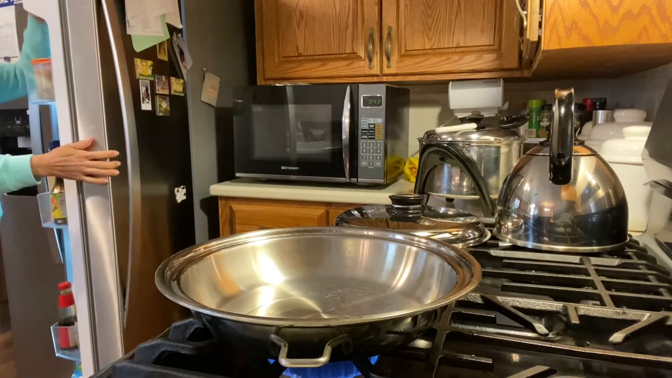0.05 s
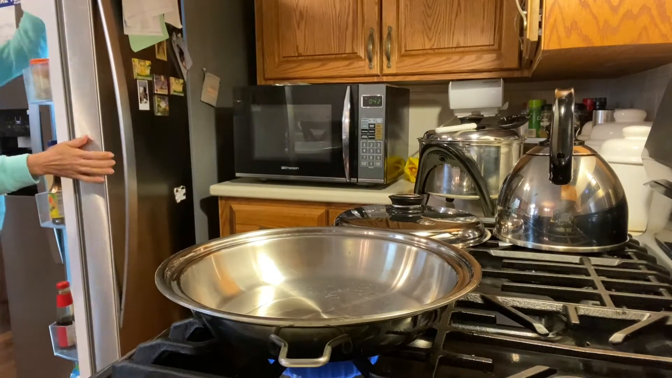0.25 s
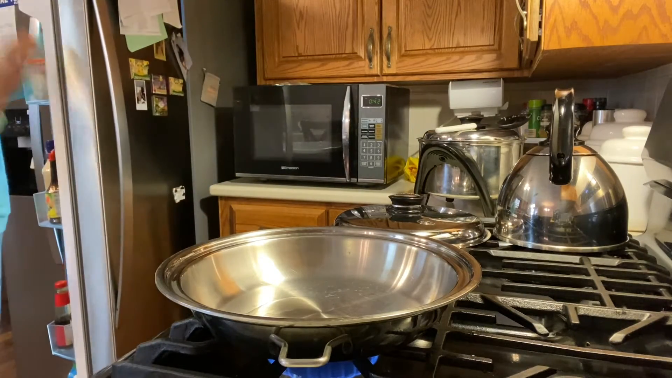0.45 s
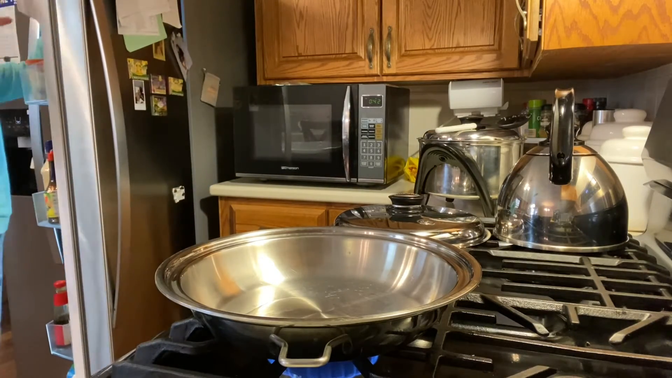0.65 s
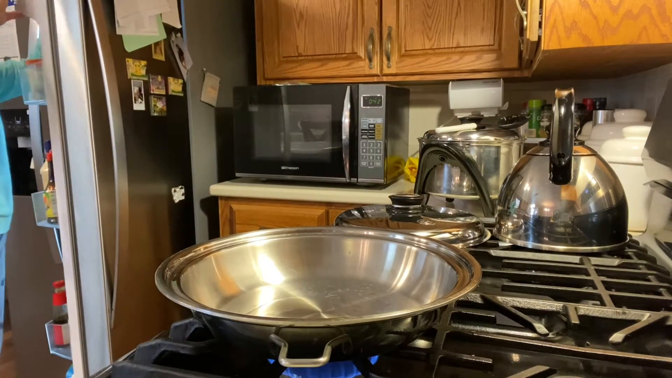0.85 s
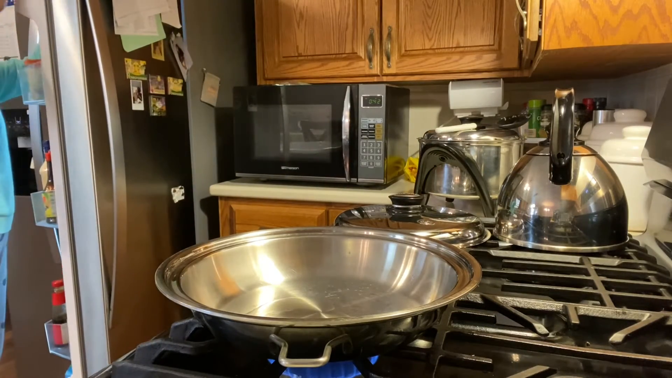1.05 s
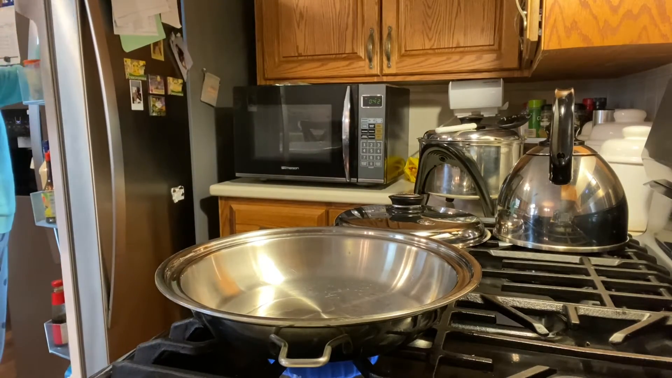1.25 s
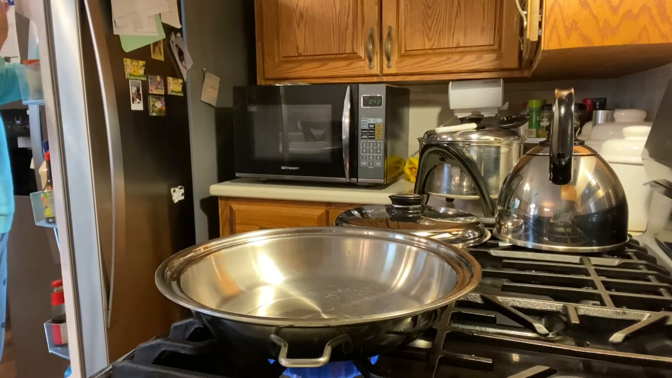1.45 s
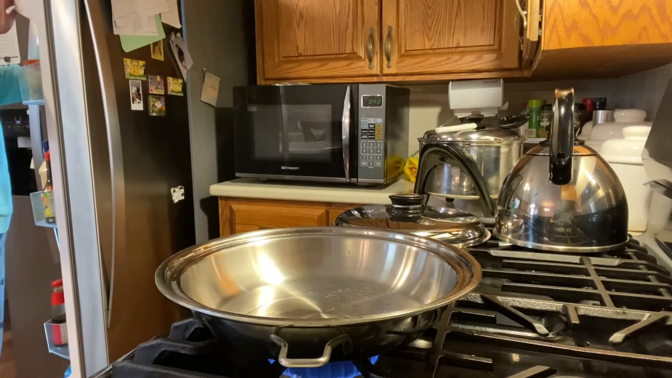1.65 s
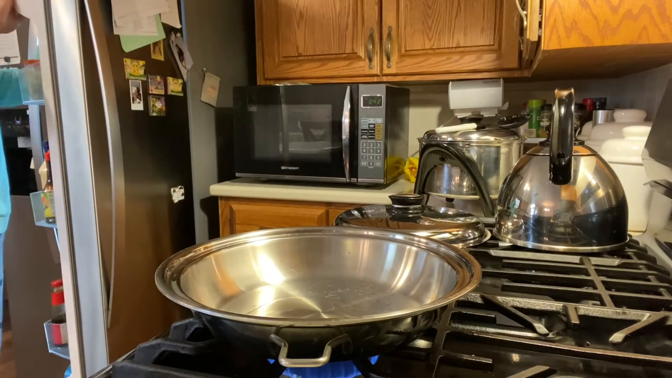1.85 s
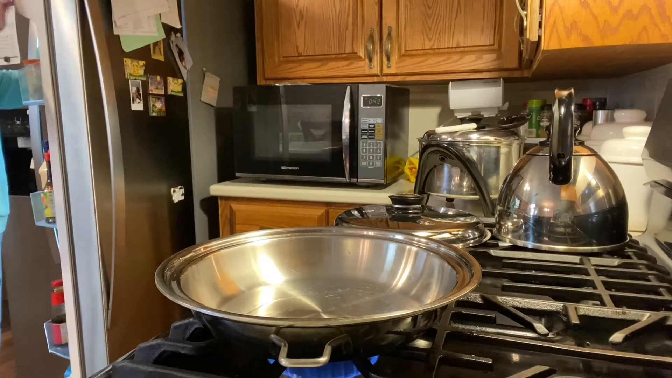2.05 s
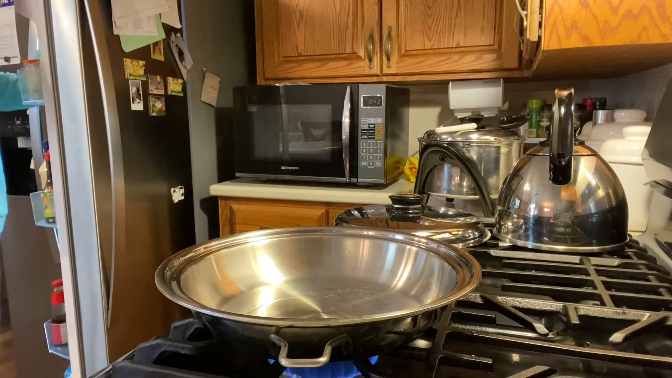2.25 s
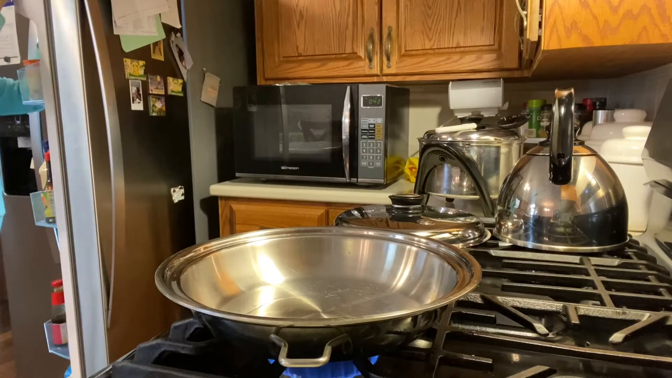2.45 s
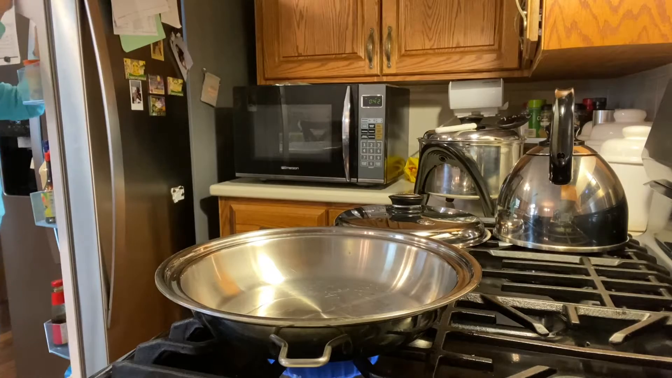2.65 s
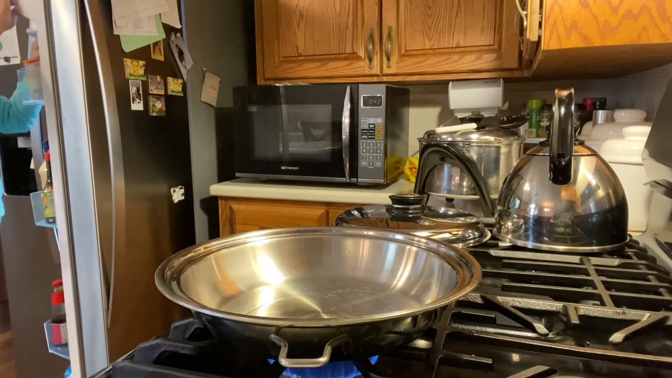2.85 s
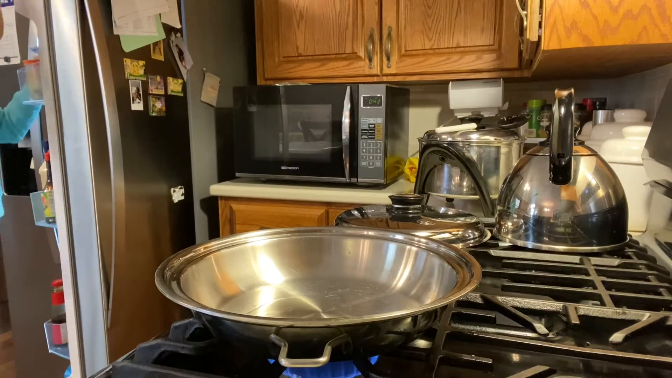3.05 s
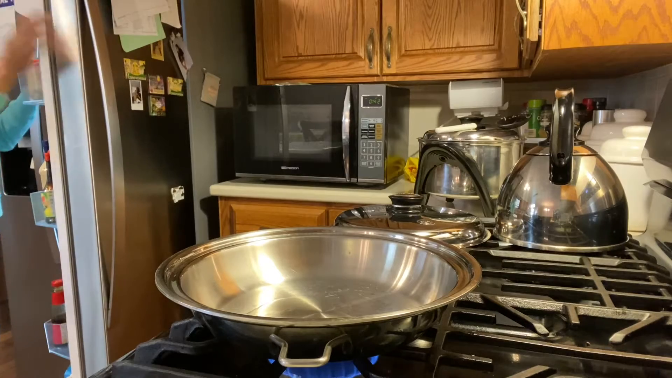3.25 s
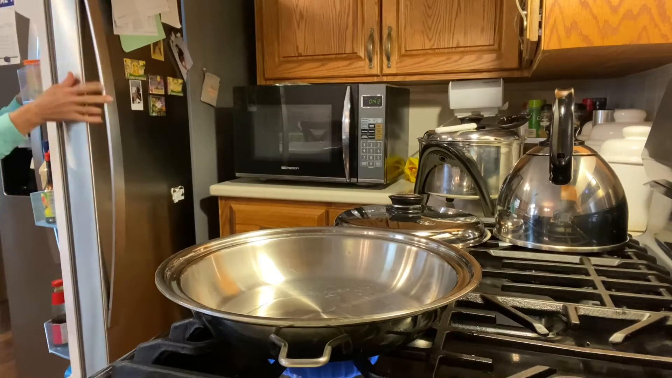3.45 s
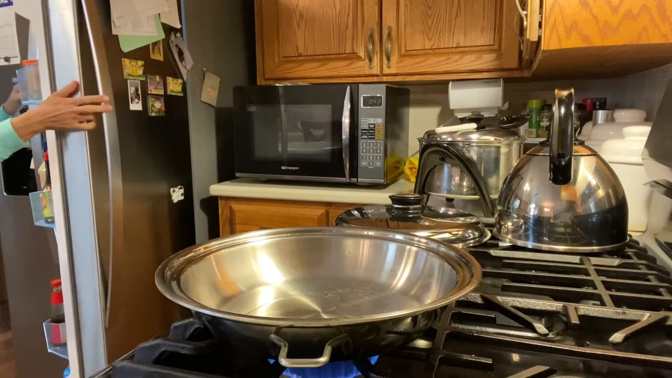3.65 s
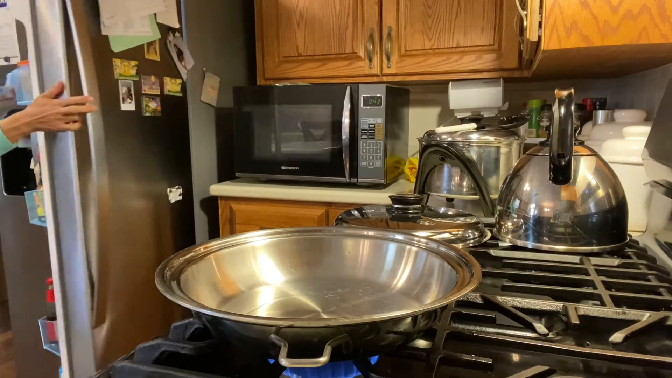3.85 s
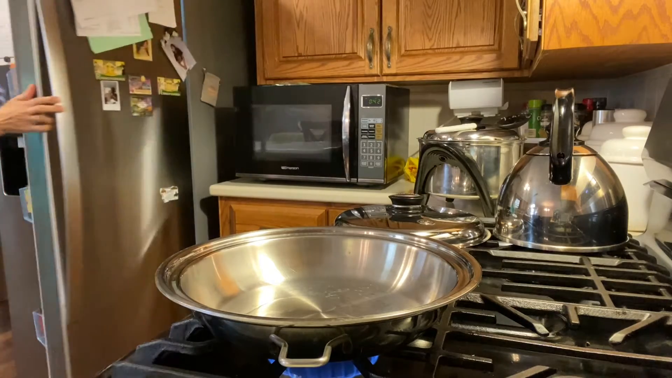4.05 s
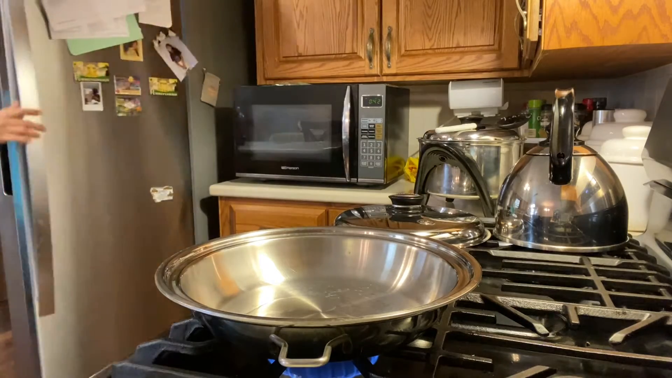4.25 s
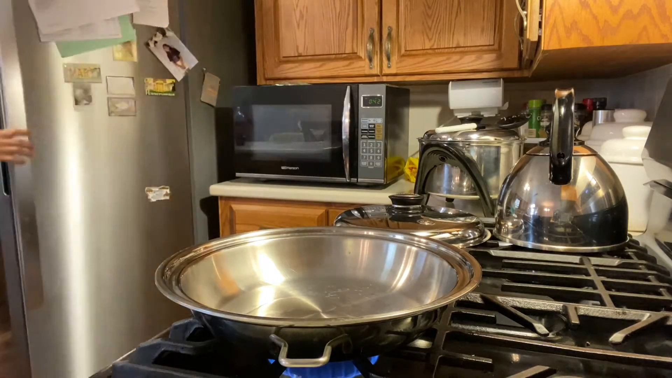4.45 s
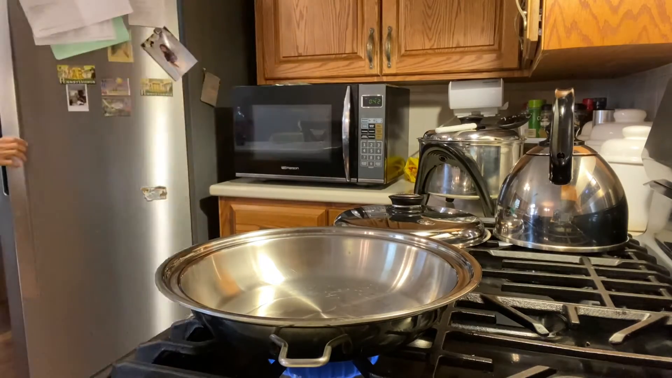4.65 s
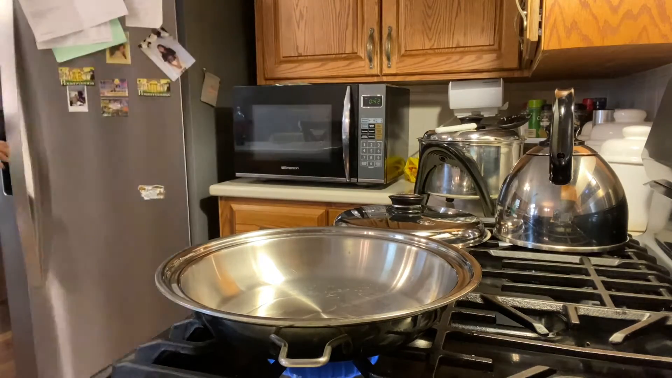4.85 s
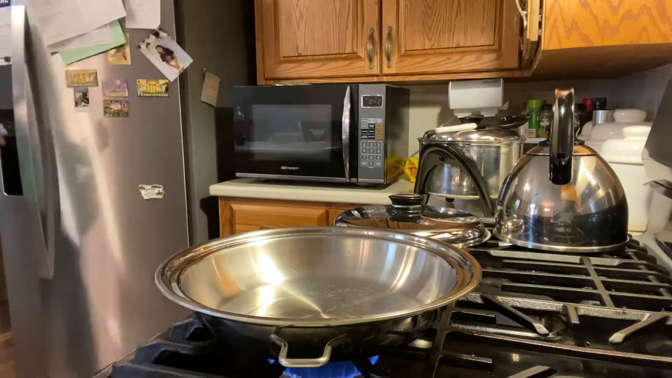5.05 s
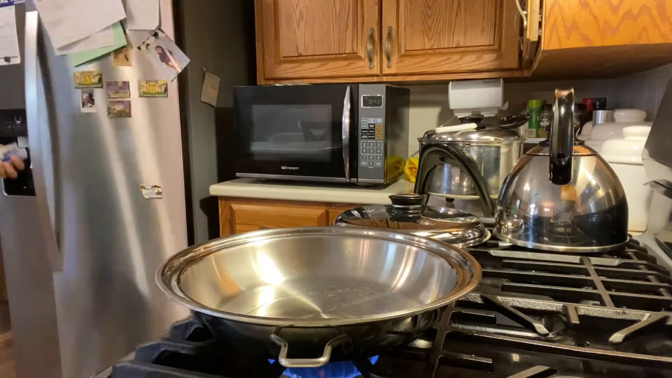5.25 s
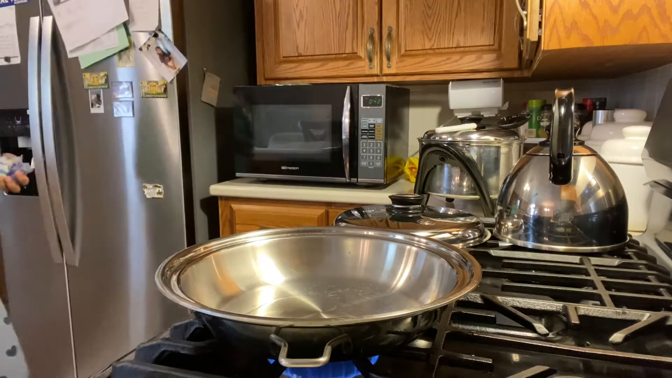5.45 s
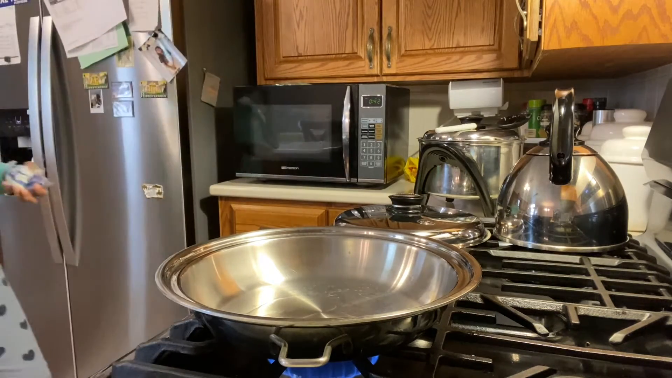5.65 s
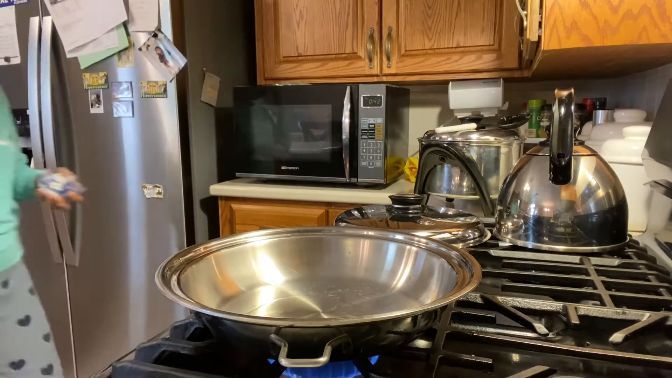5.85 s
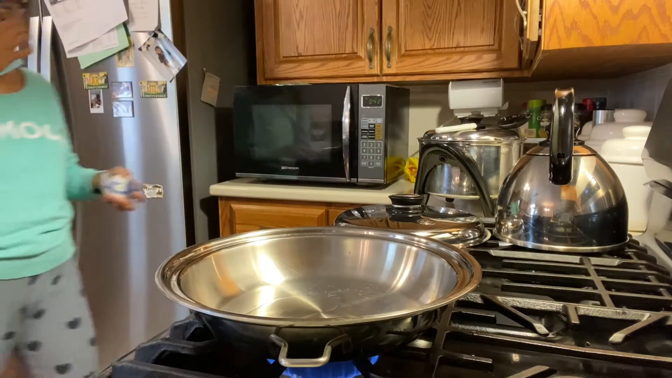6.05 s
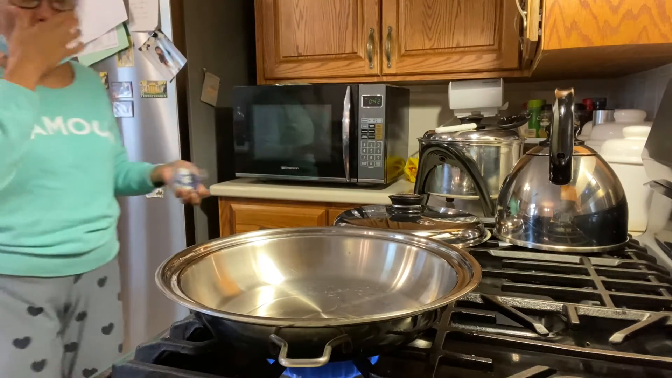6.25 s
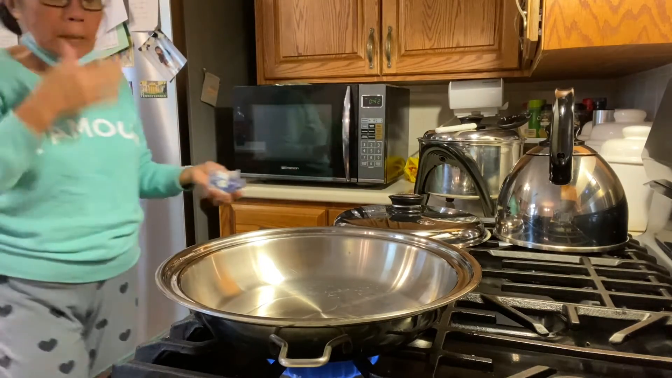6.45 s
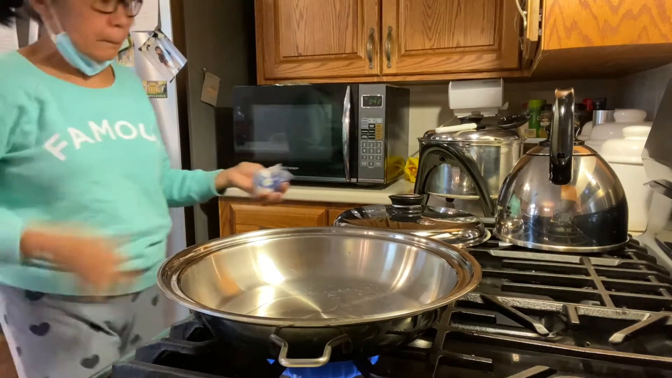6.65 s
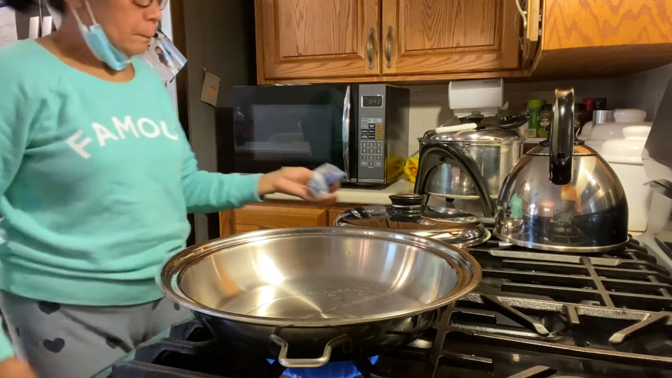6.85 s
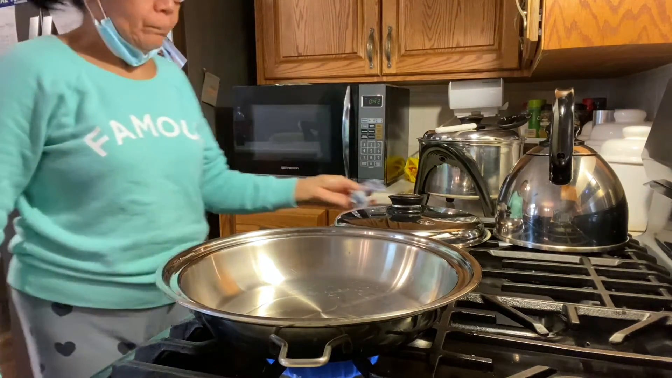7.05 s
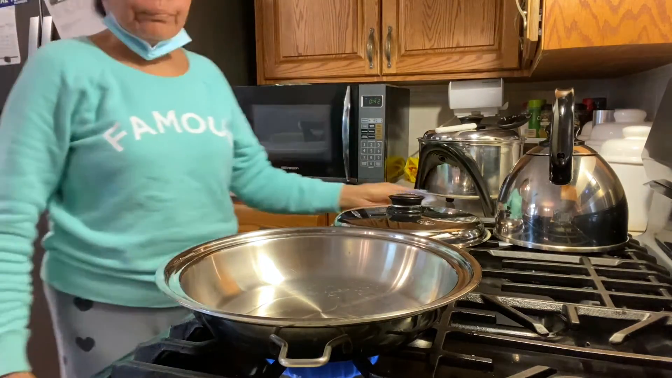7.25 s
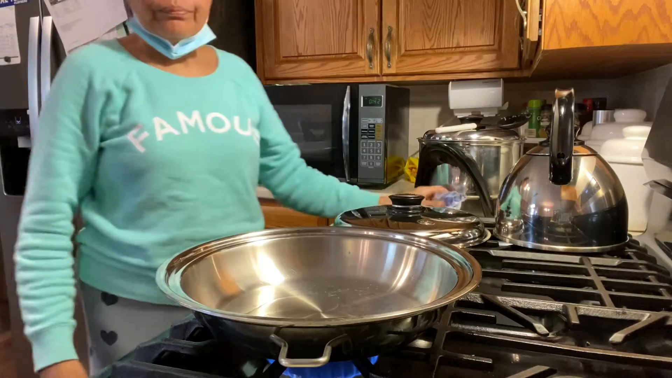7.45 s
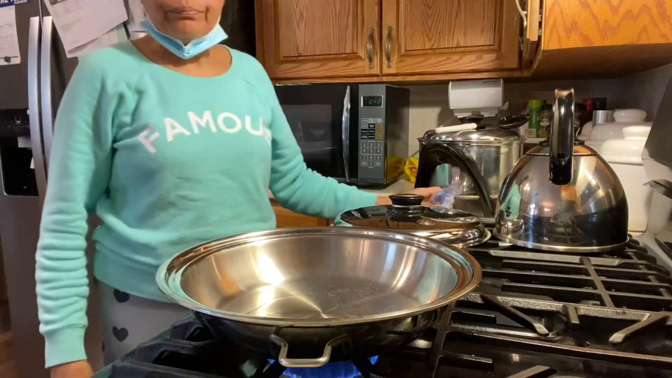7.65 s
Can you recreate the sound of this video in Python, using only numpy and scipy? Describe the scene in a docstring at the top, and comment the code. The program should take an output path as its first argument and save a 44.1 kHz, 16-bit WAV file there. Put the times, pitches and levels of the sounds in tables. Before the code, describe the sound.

In a home kitchen, a refrigerator hums while containers knock, wrappers rustle and plastic clicks. A plastic drawer bangs home with a quick clatter, something settles on a shelf, and the hum drops just before the door shuts with a deep thud. Soft footsteps and clothing follow, then close packet taps. Parrots chirp and squawk in the distance. Stereo microphone nearby, handling slightly left.

```python
"""A drawer is shoved home with a clatter and a refrigerator door swings shut with a thud, after some rummaging.
The hum drops just before the door lands and runs down; footsteps and a few taps at the counter follow.
Parrots chirp and rasp further off in the house. The close sounds reach the left microphone first.
Blows ring sine modes and noise bursts, rubbing is random grains, parrots are gliding rasped sines,
the hum is wavering sines over coloured noise; a decaying noise tail is the hard kitchen's echo."""
import sys
import numpy as np
from scipy import signal
from scipy.fft import rfft, irfft, next_fast_len
from scipy.io import wavfile

SR = 44100
rng = np.random.default_rng(int(sys.argv[2]) if len(sys.argv) > 2 else 0)


def generate_wav(sig):
    """Save sig (samples, or channels by samples) to the path in sys.argv[1] as 16-bit PCM at SR."""
    pcm = np.round(np.clip(np.atleast_2d(sig).T, -1, 1) * 32767).astype(np.int16)
    wavfile.write(sys.argv[1], SR, pcm)


N = 340517
TIME = np.arange(N) / SR  # s

# Levels in the tables are relative: the layers scale them further for distance and balance. # Ringing of door
# and cabinet, drawer, bumped cabinet: (frequency [Hz], level [dB], 60 dB decay [s])
DOOR_MODES = [(66.2, -3, 0.134), (111, -13, 0.24), (192, -22, 0.38), (239, -34, 0.83), (405, -37, 0.13),
              (505, -19.5, 0.26), (553, -19, 0.19), (680, -41, 0.33), (893, -31, 0.54), (1370, -37, 0.35)]
DRAWER_MODES = [(96, 3, 0.72), (124.5, -1, 0.63), (207, 4, 0.41), (231, 4, 0.45), (304, -5, 0.44),
                (343.5, 0, 0.63), (458, -4, 0.53), (537, 0, 0.24), (548, 14, 0.045), (723, -7, 0.2),
                (900, -9.5, 0.36), (876, 17, 0.027), (1197, 0, 0.18), (1260, 17, 0.034)]
CABINET_MODES = [(92, -1, 0.53), (122.5, -2.5, 0.41), (201.3, 3.5, 0.29), (238, -1.5, 0.4), (400.6, -9, 0.15),
                 (690, -13, 0.38)]
# Slap of the door seal, clatter of drawer and bumped cabinet: (frequency [Hz], density [dB per Hz])
DOOR_SLAP = [(60, 0), (400, -0.5), (650, 4), (820, -1), (1150, -5), (2200, -11), (3200, -23.5), (4400, -20),
             (7800, -18), (14000, -30)]
DRAWER_CLATTER = [(60, -12.5), (250, 7.5), (450, 1.5), (800, -5.5), (1300, -9), (2200, -13.5), (8500, -24),
                  (14000, -20.5)]
# Blows on door, drawer, cabinet: (time [s], ring level [dB], clatter level [dB])
DOOR_BLOWS = [(5.468, -4, -23.5), (5.497, -24, -41.5)]
DRAWER_BLOWS = [(2.955, -26.5, -28.5), (2.972, -37.5, -36.5), (2.988, -52, -34.5)]
CABINET_BLOWS = [(1.228, -33, -56.5), (3.359, -35, -55.5), (3.386, -31.5, -57.5)]

# Containers knocking on the shelves: (time [s], level [dB], body tone [Hz], clack level [dB])
KNOCKS = [(1.066, -41, 670, -61), (1.078, -34.5, 444, -53), (1.219, -38, 600, -53),
          (1.229, -29.5, 423, -48), (1.491, -27.5, 625, -38.5), (1.54, -41.5, 454, -67),
          (1.766, -38, 646, -49.5), (2.06, -38, 548, -54.5), (3.357, -32.5, 644, -52.5)]
# Thump against ring: 0 dB at this body tone, weaker for higher ones
THUMP_HZ, THUMP_DB_PER_OCTAVE = 317, -20
# Light plastic clicks: (time [s], level [dB], band centre [Hz])
CLICKS = [(0.778, -45, 8240), (1.4579, -39, 7100), (1.5601, -38.5, 5430), (2.3278, -44, 3100),
          (2.596, -50, 5640), (2.71, -48, 3120), (3.353, -44, 7400), (4.973, -49, 3000),
          (5.2605, -41, 1180), (5.861, -48.5, 8000)]
# The plastic crinkles from just before each click until after it; level relative to the click
CRINKLE_LEAD_S, CRINKLE_S, CRINKLE_DB = 0.091, 0.33, -25.5

# Sliding packages and drawer, swinging door: (time [s], length [s], rustle level [dB], scrape level [dB])
SLIDES = [(0.736, 0.25, -67.5, -65), (0.965, 0.36, -84, -55.5), (1.383, 0.19, -72, -56),
          (1.734, 0.21, -60, -54.5), (2.067, 0.28, -70.5, -85), (2.861, 0.2, -55.5, -63),
          (5.102, 0.2, -77, -67.5)]
# The seal brushes the cabinet just before the door lands
SEAL_LEAD_S, SEAL_BRUSH_S, SEAL_RUSTLE_DB, SEAL_SCRAPE_DB = 0.055, 0.079, -55, -52.5
# Colour of wrappers and of boxes rubbing: (frequency [Hz], density [dB per Hz])
RUSTLE = [(500, 5), (2000, 10.5), (5000, 4), (8000, 3), (14000, 3)]
SCRAPE = [(200, -27.5), (420, 0.5), (700, -16), (1500, -14), (3000, -27.5)]
# Clothes and slippers on the way to the counter: (time [s], level [dB])
SHUFFLE = [(5.3, -121), (6, -66.5), (6.7, -64), (7.72, -64)]

# Taps of a light packet close by: (time [s], level [dB])
TAPS = [(6.246, -32.5), (7.489, -28.5), (7.513, -22.5), (7.523, -23), (7.602, -20.5)]
# Footsteps, all on the same floor: (time [s], level [dB], thump against ring [dB])
STEPS = [(5.817, -30, 0), (6.563, -44, 2.5), (7.16, -42.5, 4.5)]
FLOOR_HZ, SOLE_SLAP_DB = 354, -14  # slap relative to the step

# Whistles climbing to a crest, then swooping to a sinking note: (crest time [s], length after it [s],
# crest pitch [Hz], held pitch [Hz], fall time [s], level [dB], rasp [0-1], octave level [dB])
SWOOPS = [(0.04, 0.07, 2900, 2406, 0.02, -55, 0.3, -1), (0.53, 0.28, 2950, 1329, 0.039, -68.5, 0.32, -7),
          (4.615, 0.16, 3100, 1710, 0.048, -65.5, 0.48, -5),
          (7.46, 0.071, 3700, 3050, 0.047, -56.5, 0.36, 8.5)]
# The climb starts this much lower, softer and harsher
CLIMB_S, CLIMB_OCTAVES, CLIMB_DB, CLIMB_RASP = 0.074, 0.46, -9, 0.43
# Softer at the crest; the last note fades and sinks
SWOOP_CREST_DB, SWOOP_FADE_DB, SWOOP_SAG_OCTAVES = -2, -2.5, -0.3
# Short chirps: (time [s], length [s], pitch [Hz], rise [octaves], level [dB], rasp [0-1], octave level [dB])
CHIRPS = [(0.069, 0.048, 4300, -0.29, -58.5, 0.75, -1.5), (0.107, 0.069, 3467, -0.04, -55.5, 0.27, -13.5),
          (0.543, 0.0299, 1996, -0.3, -58.5, 0.46, -19), (4.792, 0.0397, 1898, 0.41, -60, 0.21, -12.5),
          (5.545, 0.13, 2107, 0.088, -58, 0.2, -18), (5.674, 0.022, 3090, 0.115, -60.5, 0.66, -17),
          (5.912, 0.021, 2380, 0.081, -50, 0.39, 6.5), (6.374, 0.065, 4064, 0.3, -56, 0.24, -9.5),
          (7.518, 0.12, 2383, 0.096, -56, 0.07, -23)]
# Harsh squawks: (time [s], length [s], pitch [Hz], level [dB])
SQUAWKS = [(5.096, 0.09, 1682, -71), (6.079, 0.076, 3063, -58), (6.172, 0.066, 3470, -49.5),
           (6.641, 0.0365, 2753, -48), (6.831, .066, 3440, -50.5), (7.034, 0.13, 2523, -50.5)]
SQUAWK_RASP, SQUAWK_CLEAR_RASP = 0.92, 0.28  # harsh start, clearer end
SQUAWK_RISE_OCTAVES, SQUAWK_OCTAVE_DB, SQUAWK_HISS_DB = 0.076, -0.5, -6
SQUAWK_RATTLE_HZ, SQUAWK_RATTLE_DB = 110, 5.5

# Refrigerator motor and fan, then faint steady kitchen tones: (frequency [Hz], rms level [dB])
HUM = [(59.2, -57.5), (177.6, -68.5), (204.2, -58.5), (355.3, -71)]
WHINE = [(120, -67.5), (2050, -73)]
# The closing door shuts the hum in: when, how fast and how far it falls; it also runs down
HUM_SHUT_S, HUM_SHUT_DB_PER_S, HUM_SHUT_DB, HUM_RUN_DOWN_DB_PER_S = 5.13, -90, -7, -12
# Air noise of the kitchen: (frequency [Hz], density [dB per Hz])
AIR = [(25, -20), (55, -4), (90, -11), (130, -2), (260, -9.5), (370, -12), (550, -20.5), (1500, -29),
       (2300, -27.5), (6000, -40), (15000, -34.5)]
AIR_DB = -58.5

# Echo of the kitchen: (frequency [Hz], 60 dB decay [s])
ROOM_T60 = [(200, 0.64), (1840, 0.42), (4850, 0.43), (15000, 0.13)]
# Left-right likeness of diffuse sound: (frequency [Hz], likeness [0-1])
SAME = [(60, 0.94), (200, 0.037), (500, 0.071), (5000, 0.024), (12000, 0.28)]
# Microphone response: (frequency [Hz], gain [dB])
MICROPHONE = [(20, -32), (40, 4), (9350, -5), (10050, -29), (10900, -33), (11800, -11), (14000, -10.5),
              (15400, -43)]
EDGE_HZ = 15750  # upper band limit


def door():
    """The seal slaps the cabinet, which booms; a weaker second blow is the door shelves jolting just after."""
    ring, slap = struck(DOOR_BLOWS, DOOR_MODES, DOOR_SLAP, clatter_t60=0.06, rise_cycles=0.55, spike=3)
    return direct(ring + slap, balance_db=-2.5) + amp(1.0) * room(slap)


def drawer():
    """A plastic drawer hits its stop: one hard blow, then two quick lighter ones that ring less each time."""
    ring, clatter = struck(DRAWER_BLOWS, DRAWER_MODES, DRAWER_CLATTER,
                           clatter_t60=0.047, rise_cycles=6.0, spike=4.4)
    return direct(ring + clatter, balance_db=-2.5) + amp(5.0) * room(clatter)


def cabinet():
    """The open door and cabinet are bumped and boom in their low modes."""
    ring, clatter = struck(CABINET_BLOWS, CABINET_MODES, DRAWER_CLATTER,
                           clatter_t60=0.04, rise_cycles=0.91, spike=2.1)
    return direct(ring + clatter, balance_db=-3.5) + amp(8.5) * room(clatter)


def struck(blows, modes, spectrum, clatter_t60, rise_cycles, spike):
    """Each blow clatters and rings the modes; low modes answer later and take longer to build up."""
    body, ring, clatter = np.zeros(SR), np.zeros(N), np.zeros(N)
    for hz, db, t60 in modes:
        t = np.maximum(np.arange(SR) / SR - 0.19 / hz, 0)  # starts 0.19 cycles late
        build_up = 1 - np.exp(-t * hz / rise_cycles)
        body -= amp(db - 60 * t / t60) * build_up * np.sin(2 * np.pi * hz * t)
    for s, ring_db, clatter_db in blows:
        add(ring, s, amp(ring_db) * body)
        hit = colour(burst(clatter_t60, spike), spectrum)
        add(clatter, s, sized(hit, clatter_db))
    return ring, clatter


def knocks():
    """Containers land with a clack and a brief rattle: the lower one rings, the more it thumps."""
    out = np.zeros(N)
    for s, db, hz, clack_db in KNOCKS:
        thump_db = THUMP_DB_PER_OCTAVE * np.log2(hz / THUMP_HZ)
        clack = band(burst(t60=0.062, spike=0.83), 890, 1100, order=1)
        loose = band(rattle(t60=0.12, ticks_per_s=330), 1670, 2260)
        add(out, s, knock(db, hz, thump_db))
        add(out, s, sized(clack, clack_db))
        add(out, s, sized(loose, clack_db - 8.5))
    return direct(out, balance_db=-5.0) + amp(-1.0) * room(out)


def knock(db, hz, thump_db):
    """A hollow body tone and a thump of what lies beneath, as band-filtered contacts."""
    contact = burst(t60=0.11, spike=5.3)
    hollow = sized(band(contact, 210, 650), -3.0)
    tone = sized(band(contact, hz / 1.06, hz * 1.046, order=1), -0.99)
    thump = sized(band(burst(t60=0.08, spike=25), 100, 290, order=3), thump_db)
    return amp(db - 11.0) * (hollow + tone + thump)


def rattle(t60, ticks_per_s):
    """Loose contents tick at random and settle."""
    t = np.arange(SR // 3) / SR
    ticks = rng.standard_normal(len(t)) * (rng.random(len(t)) < ticks_per_s / SR)
    return ticks * amp(-60 * t / t60)


def clicks():
    """Thin plastic snaps: very short bursts, each with its own broad colour."""
    out = np.zeros(N)
    for s, db, hz in CLICKS:
        snap = colour(burst(t60=0.004, spike=9), RUSTLE)
        snap = band(snap, 900, 20000, order=1)
        octave = band(snap, hz / np.sqrt(2), hz * np.sqrt(2), order=1)
        add(out, s, sized(snap, db - 13.5) + sized(octave, db - 14))
    return amp(-1.5) * direct(out, balance_db=-3.0) + amp(8.5) * room(out)


def handling():
    """Wrappers rustle, boxes scrape and the seal brushes; later, clothes and slippers brush along."""
    rustle, scrape = np.zeros((2, N))
    seal = (DOOR_BLOWS[0][0] - SEAL_LEAD_S, SEAL_BRUSH_S, SEAL_RUSTLE_DB, SEAL_SCRAPE_DB)
    for s, length, rustle_db, scrape_db in [*SLIDES, seal]:
        stroke = signal.windows.tukey(int(length * SR), 0.6)
        add(rustle, s, amp(rustle_db) * stroke)
        add(scrape, s, amp(scrape_db) * stroke)
    crinkle = signal.windows.tukey(int(CRINKLE_S * SR), 0.6)
    for s, db, _ in CLICKS:
        add(rustle, s - CRINKLE_LEAD_S, amp(db + CRINKLE_DB) * crinkle)
    walking = amp(np.interp(TIME, *np.transpose(SHUFFLE)))
    out = (rustle + amp(5.0) * walking) * friction(RUSTLE, grains_per_s=1300, spread_db=2.0)
    out += (scrape + amp(-11.0) * walking) * friction(SCRAPE, grains_per_s=750, spread_db=-0.5)
    return direct(out, balance_db=-1.5) + room(out)


def friction(spectrum, grains_per_s, spread_db):
    """Rubbing as many tiny slips of uneven size at random moments."""
    slips = rng.standard_normal(N) * (rng.random(N) < grains_per_s / SR)
    size = amp(spread_db * np.minimum(rng.exponential(1, N), 4))
    return evened(colour(slips * size, spectrum))


def steps():
    """Slippers land dully on the floor, with a soft slap of the sole."""
    out = np.zeros(N)
    for s, db, thump_db in STEPS:
        slap = band(burst(t60=0.026, spike=14.0), 903, 1710, order=3)
        add(out, s, knock(db, FLOOR_HZ, thump_db))
        add(out, s, sized(slap, db + SOLE_SLAP_DB))
    return direct(out, balance_db=4) + room(out)


def taps():
    """A light packet handled and set down close by: short, dry ticks with a hollow ring."""
    out = np.zeros(N)
    for s, db in TAPS:
        contact = burst(t60=0.04, spike=6)
        tick = sized(band(contact, 940, 2300), db - 24.5)
        hollow = sized(band(contact, 100, 3600, order=1), db - 26.5)
        add(out, s, tick + hollow)
    return direct(out, balance_db=-9.0) + amp(-9.5) * room(out)


def birds():
    """Distant parrots swoop, chirp and squawk, heard mostly by their echo."""
    out = np.zeros(N)
    for crest_s, *shape in SWOOPS:
        start = crest_s - CLIMB_S
        cut = max(round(-start * SR), 0)  # a call already under way at time zero
        add(out, start, swoop(*shape)[cut:])
    for s, length, hz, rise, db, rasp, octave_db in CHIRPS:
        add(out, s, syllable(lift(length, hz, rise), db, rasp, octave_db))
    for s, length, hz, db in SQUAWKS:
        add(out, s, squawk(length, hz, db))
    return amp(-2.5) * out + amp(8.5) * room(out)


def swoop(length, crest_hz, held_hz, fall_s, db, rasp, octave_db):
    """The whistle clears as it climbs, rounds the crest, then falls to a last note that keeps sinking."""
    t = np.arange(-CLIMB_S, length, 1 / SR)
    below, after = np.maximum(-t / CLIMB_S, 0), np.maximum(t, 0)
    height = np.exp(-(after / fall_s) ** 2)  # 1 up to the crest, then falling to 0
    sag = (after / length) ** 2
    bend_octaves = SWOOP_SAG_OCTAVES * sag - CLIMB_OCTAVES * below ** 2
    hz = held_hz * (crest_hz / held_hz) ** height * 2 ** bend_octaves
    level_db = db + CLIMB_DB * below + SWOOP_CREST_DB * height ** 2 + SWOOP_FADE_DB * sag
    return syllable(hz, level_db, rasp + CLIMB_RASP * below, octave_db - 10 * height)


def squawk(length, hz, db):
    """A harsh, rattling cry with a hiss of air, whose note clears towards its end."""
    pitch = lift(length, hz, SQUAWK_RISE_OCTAVES)
    clearing = np.sin(np.linspace(0, np.pi / 2, len(pitch))) ** 4
    rasp = SQUAWK_RASP + (SQUAWK_CLEAR_RASP - SQUAWK_RASP) * clearing
    voice = syllable(pitch, db, rasp, SQUAWK_OCTAVE_DB - 8 * clearing)
    hiss = evened(band(rng.standard_normal(len(pitch)), 2040, 8000))
    hiss *= signal.windows.tukey(len(pitch), 0.2)
    rattle_db = SQUAWK_RATTLE_DB * (0.5 - clearing) * drift(len(pitch), SQUAWK_RATTLE_HZ)
    return evened(amp(rattle_db)) * (voice + amp(db + SQUAWK_HISS_DB) * hiss)


def syllable(hz, db, rasp, octave_db):
    """A whistle along the given pitch; in a rasp the pitch and the loudness flutter chaotically."""
    turn = 2 * np.pi * np.cumsum(hz * (1 + 0.24 * rasp * drift(len(hz), 700))) / SR
    overtones = np.sin(2 * turn) + amp(-14) * np.sin(3 * turn)
    voice = np.sin(turn) + amp(octave_db) * overtones
    voice *= amp(5 * rasp * drift(len(hz), 500))
    return amp(db) * evened(voice * signal.windows.tukey(len(hz), 0.2))


def lift(length, hz, octaves):
    """Pitch of a short call: it moves quickly, up or (if negative) down, and levels off."""
    u = np.linspace(0, 1, int(length * SR))
    return hz * 2 ** (octaves * (0.5 ** 2 - (1 - u) ** 2))  # passes hz halfway


def hum():
    """Wavering motor and fan lines that are shut in and run down, over fainter tones that stay."""
    wander = 0.25 * drift(N, 3)  # phase, rad
    waver = amp(0.6 * drift(N, 5))
    motor, whine = tones(HUM, wander), tones(WHINE, wander)
    since = np.maximum(TIME - HUM_SHUT_S, 0)
    shut_db = np.maximum(HUM_SHUT_DB_PER_S * since, HUM_SHUT_DB)
    running = amp(shut_db + HUM_RUN_DOWN_DB_PER_S * since)
    return direct(waver * (running * motor + whine), balance_db=-5.5)


def tones(lines, wander):
    """Sum of sines at rms levels, all sharing one phase wander."""
    return sum(np.sqrt(2) * amp(db) * np.sin(2 * np.pi * hz * TIME + wander) for hz, db in lines)


def air():
    """Soft, steady rush of the room: coloured noise around both microphones."""
    noise = np.array([evened(colour(x, AIR)) for x in rng.standard_normal((2, N))])
    return amp(AIR_DB) * pair(noise)


def room(x):
    """Diffuse echo of the kitchen: a noise tail, each band dying at its own speed."""
    hz, t, z = signal.stft(pair(rng.standard_normal((2, SR))), SR, nperseg=256)
    decay = amp(-60 * t / read(ROOM_T60, hz)[:, None])
    tail = signal.istft(z * decay, SR, nperseg=256)[1]
    tail *= 1 - np.exp(-np.arange(tail.shape[1]) / SR / 0.00057)  # soft onset
    return signal.fftconvolve(x[None], tail / np.linalg.norm(tail[0]), axes=1)[:, :N]


def direct(x, balance_db):
    """Sound reaches the right microphone 0.27 ms late; balance is left level over right."""
    late = np.interp(TIME - 0.00027, TIME, x)
    return np.array([x * amp(balance_db / 2), late * amp(-balance_db / 2)])


def pair(x):
    """Two unrelated signals become a left and a right that share their bass."""
    size = next_fast_len(x.shape[1], True)
    a, b = rfft(x, size)
    same = np.clip(read(SAME, np.fft.rfftfreq(size, 1 / SR)), -1, 1)
    right = same * a + np.sqrt(1 - same ** 2) * b
    return irfft(np.array([a, right]), size)[:, :x.shape[1]]


def burst(t60, spike):
    """A contact: one sharp spike and the dense, dying ring that follows it."""
    t = np.arange(SR // 3) / SR
    x = rng.choice([-1., 1.], len(t)) * amp(-60 * t / t60)
    x[0] += spike
    return x


def sized(x, db):
    """Scales a hit so that its whole energy, packed into 20 ms, has the given rms level."""
    return amp(db) * x / np.sqrt(np.sum(x ** 2) / (SR / 50))


def drift(count, hz):
    """Random wander of unit rms, slower than about the given frequency."""
    size = next_fast_len(count, True)
    rolloff = 1 + (np.fft.rfftfreq(size, 1 / SR) / hz) ** 4
    spectrum = rfft(rng.standard_normal(size)) / rolloff
    spectrum[0] = 0
    return evened(irfft(spectrum, size))[:count]


def colour(x, points):
    """Causal minimum-phase filter with the given spectrum."""
    log_gain = np.log(amp(read(points, abs(np.fft.fftfreq(8192, 1 / SR)))))
    taps = np.fft.ifft(np.exp(np.conj(signal.hilbert(log_gain)))).real[:4096]
    return signal.fftconvolve(x, taps)[:len(x)]


def band(x, low_hz, high_hz, order=2):
    """Band-pass filter."""
    edges = [low_hz, min(high_hz, SR / 2 - 1)]
    return signal.sosfilt(signal.butter(order, edges, "band", fs=SR, output="sos"), x)


def read(points, hz):
    """Looks a curve up along a logarithmic frequency axis."""
    f, value = np.transpose(points)
    return np.interp(np.log(hz + 1), np.log(f + 1), value)


def add(mix, s, sound):
    """Lays a sound into the mix at a time in seconds."""
    part = mix[max(round(s * SR), 0):][:len(sound)]
    part += sound[:len(part)]


def amp(db):
    """Decibels to amplitude."""
    return 10 ** (np.asarray(db) / 20)


def evened(x):
    """Scales to unit rms."""
    return x / np.sqrt(np.mean(x ** 2) + 1e-20)


def scene():
    """All layers, from the refrigerator door to the air of the room."""
    fridge = door() + drawer() + cabinet() + knocks() + clicks() + handling()
    return fridge + steps() + taps() + birds() + hum() + air()


def record(dry):
    """The microphone ports notch the top treble; then the band limit."""
    heard = np.array([colour(x, MICROPHONE) for x in dry])
    low_pass = signal.firwin(511, EDGE_HZ, window=("kaiser", 9), fs=SR)
    return signal.oaconvolve(heard, low_pass[None], "same")


dry = scene()
out = record(dry)
generate_wav(out)
```